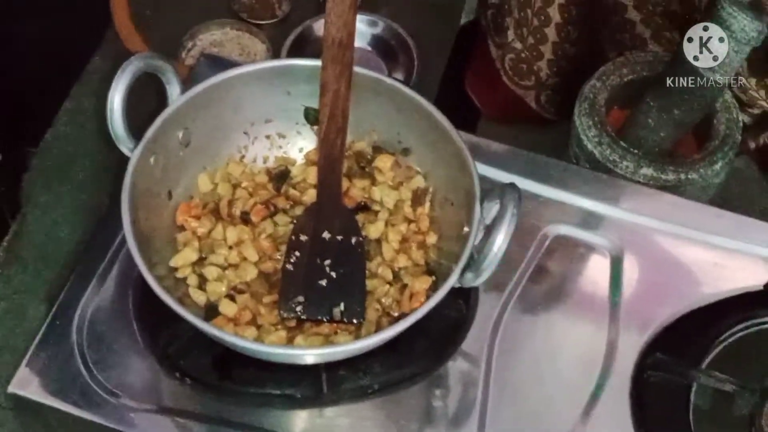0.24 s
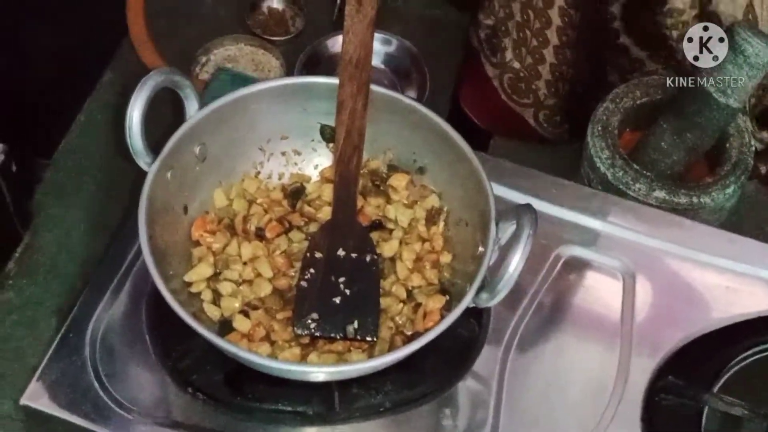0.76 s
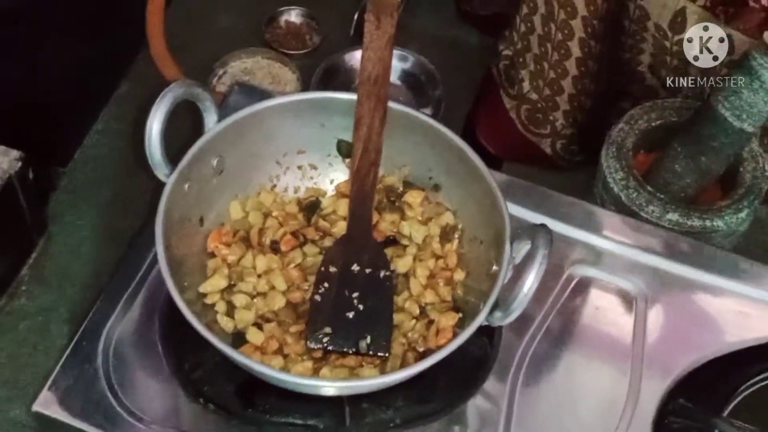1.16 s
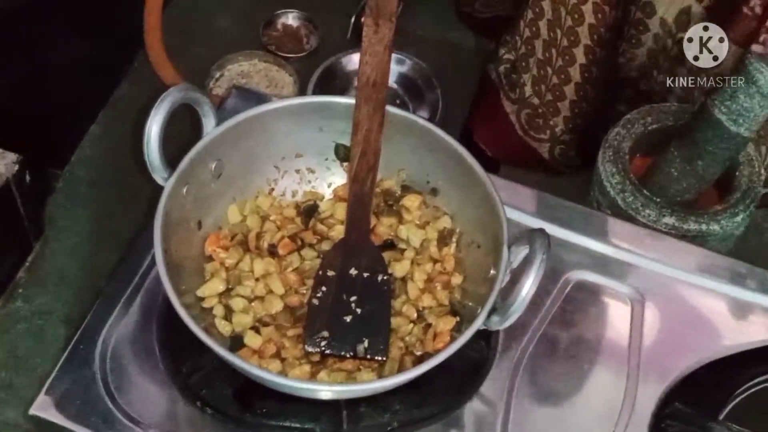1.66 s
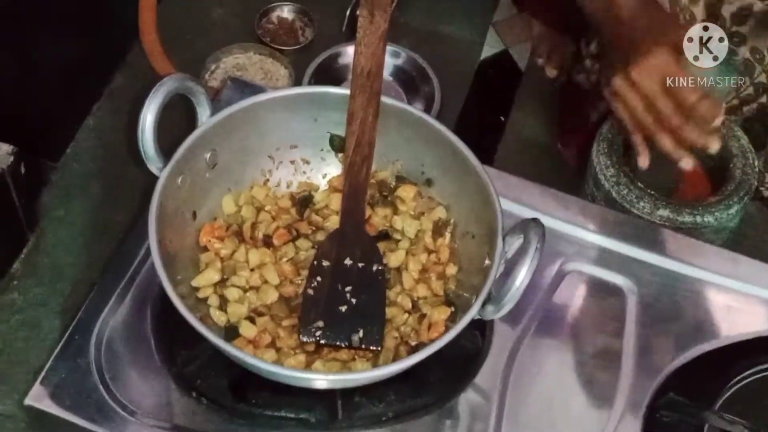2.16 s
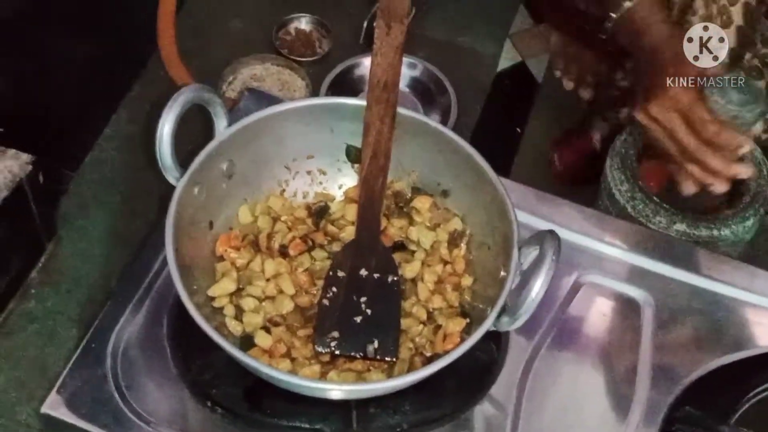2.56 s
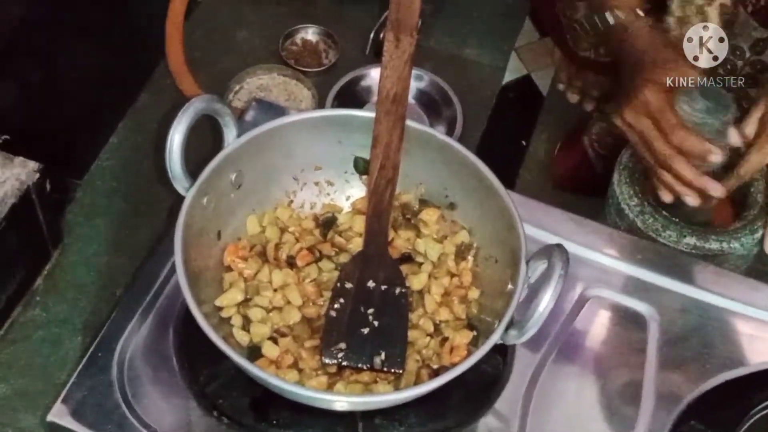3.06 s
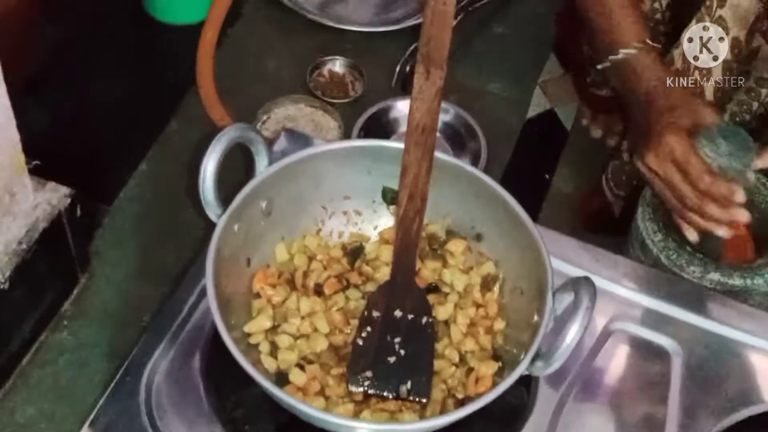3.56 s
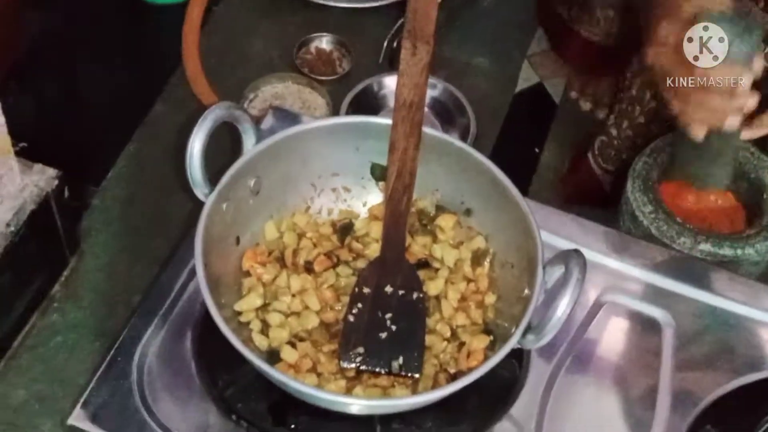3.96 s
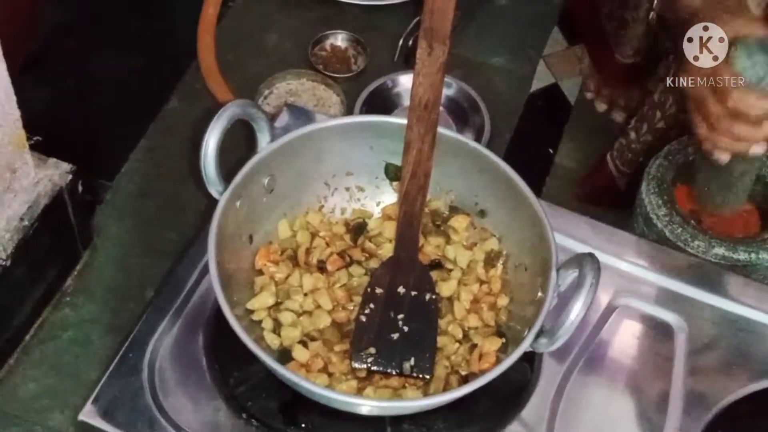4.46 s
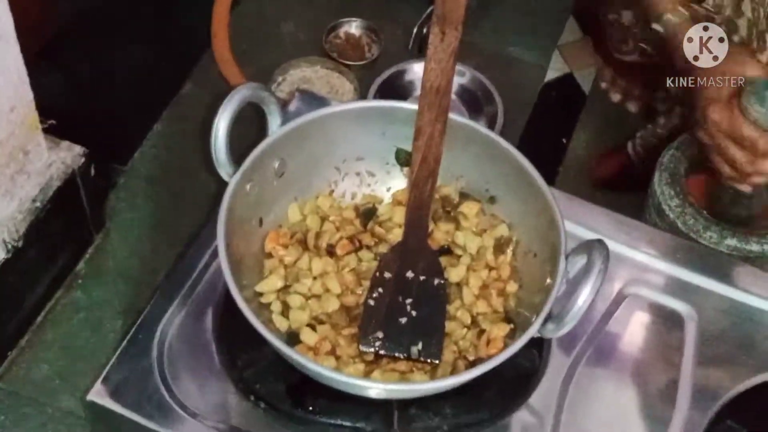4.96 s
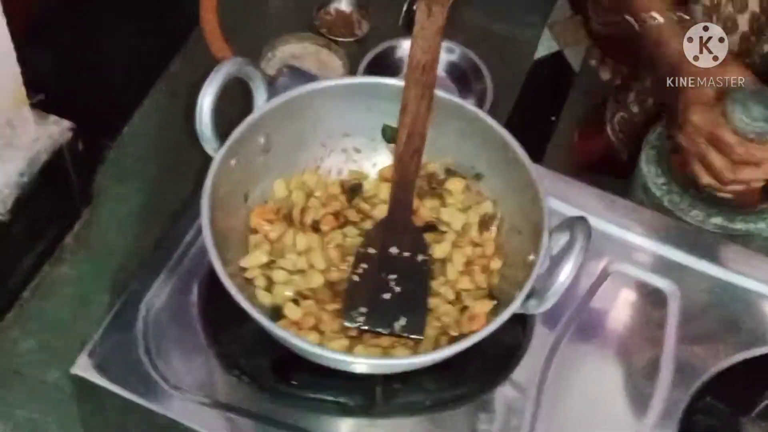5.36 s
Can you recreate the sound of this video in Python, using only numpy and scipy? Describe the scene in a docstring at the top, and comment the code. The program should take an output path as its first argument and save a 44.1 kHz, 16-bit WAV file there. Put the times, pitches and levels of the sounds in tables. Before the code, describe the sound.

A pan sizzles faintly throughout, with tiny oil spits, over soft burner noise and a low hum in a small, hard-walled kitchen. At 0.1 seconds comes a dull bump with a cloth rustle, then light ticks, and at 1.1 seconds a vessel is set down with a hollow, ringing knock and a small rebound. From 1.9 seconds a nearby stone pestle knocks into a mortar of moist spices: a soft touch, firmer strokes at 2.0 and 2.3, a tap at 2.6 and another knock at 2.9. The loudest blow booms at about 4.1 seconds, followed by a heavy double knock at 4.4, both ringing briefly in the room. Lighter knocks follow at 4.7, 4.9 and 5.5 seconds. Grit ticks between strokes, bangles tinkle very faintly near 2.9, 4.1 and 4.7 seconds, and cloth rustles softly near the end.

```python
"""Pestle and mortar in a kitchen

A stone pestle pounds moist spices in a stone mortar on the floor of a small, hard-walled kitchen.
A vessel is set down first; then come tentative knocks and two heavy blows that boom as the modes of
mortar, floor and room ring. Grit ticks, bangles tinkle and cloth rustles. A pan sizzles faintly over
burner noise and a low hum; a limiter ducks the sound under the hardest blow."""
import sys
import numpy as np
from scipy import signal
from scipy.fft import rfft, irfft
from scipy.io import wavfile
from scipy.ndimage import uniform_filter1d, minimum_filter1d

SR = 44100
rng = np.random.default_rng(int(sys.argv[2]) if len(sys.argv) > 2 else 0)


def put_to_file(sound):
    """Save the sound as 16-bit audio at rate SR, in the file named by the first command-line argument."""
    columns = np.atleast_2d(sound).T  # one column per channel
    safe = np.clip(columns, -1, 1)
    whole_steps = np.round(safe * 32767)
    wavfile.write(sys.argv[1], SR, whole_steps.astype(np.int16))


N = 247652
TIME = np.arange(N) / SR
RING_TIME = TIME[:SR]

# spectrum of a knock cushioned by paste: f/Hz, gain/dB
KNOCK_SPECTRUM = [(40, -33), (70, -14), (110, -11.5), (200, -4.5), (290, 1.5), (600, 1.5), (900, 0.5),
                  (1250, 1), (1700, -1), (2300, 2), (2750, -5.5), (3400, -14.5), (4300, -25), (9000, -56)]
# spectrum of ticks and rustle: f/Hz, gain/dB
TICK_SPECTRUM = [(200, -42), (1000, 2), (2200, 7), (3300, -2.5), (5200, -5), (6500, -15.5), (9000, -3.5),
                 (15000, -28)]


def pestle(ring_db, variation_db, room_db, build_s):
    """Impact excitation: each spot struck on the bowl drives mortar and room a little differently."""
    # mortar, floor and room ringing together: f/Hz, energy/dB, T60/s
    mortar_modes = [(69.8, 1.5, 0.59), (198.6, -15, 0.66), (276.7, -5.5, 0.24), (294, -14.5, 0.63),
                    (344, -22.5, 0.77), (400, -5.5, 0.16), (453, -5, 0.25), (481.2, -8, 0.4),
                    (562, -13.5, 0.55), (638.4, -3, 0.34), (737, -17, 0.62), (810, -5.5, 0.13),
                    (887, -5, 0.35), (891, -6.5, 0.23), (971, -7, 0.31), (1069, -7.5, 0.41),
                    (1480, -8, 0.19), (1630, -7.5, 0.26), (1850, -3, 0.13), (2096, -10, 0.39),
                    (2377, -34, 0.55), (2497, -8.5, 0.35)]
    # the stone itself, damped by hand and paste: f/Hz, energy/dB, T60/s
    stone_modes = [(293, -10, 0.011), (629, -7.5, 0.031), (920, -10, 0.011), (1614, -8, 0.0054),
                   (2280, -7.5, 0.011)]
    out, variation = np.zeros(N), from_db(variation_db)
    common_room = kitchen(room_db, build_s)
    boom = from_db(ring_db) * ringing(mortar_modes)
    stone = ringing(stone_modes, scatter=0)
    for onset, force_db, low_hz, high_hz, spot_hz in contacts():
        room = (common_room + variation * kitchen(room_db, build_s)) / np.hypot(1, variation)
        stone_db = -.7 + 2.5 * np.log2(high_hz / 1500)  # harder contacts ring more
        response = wall(room, echo_db=-8.5) + boom + from_db(stone_db) * stone
        response = bowl_resonance(response, spot_hz, boost_db=5.0, q=4.7)
        add(out, onset, from_db(force_db) * strike(response, low_hz, high_hz))
    return from_db(-2) * colour(out, KNOCK_SPECTRUM)


def contacts(cushion_octaves_per_s=13, fall_octaves_per_s=30):
    """Double impact: a stroke that lands on the bowl's side slips down and seats, lower and duller."""
    # t/s, force/dB, bass roll-off/Hz, treble roll-off/Hz, pitch of the spot struck/Hz,
    # slip/s (0: straight to the bottom), seating force over the first contact/dB
    strokes = [(1.87, -14, 260, 1400, 490, 0, 0), (2.0312, 5.7, 310, 2600, 1850, .0185, -2.6),
               (2.3368, 9.3, 190, 1680, 345, .012, 4.3), (2.640, -17, 270, 2000, 330, 0, 0),
               (2.904, 0, 230, 1380, 560, .01, 5.6), (3.967, -15, 150, 450, 303, 0, 0),
               (4.0669, 29.5, 100, 1700, 305, 0, 0), (4.4271, 12.6, 117, 2780, 2380, .06, -1),
               (4.729, 3.5, 175, 1450, 700, 0, 0), (4.909, -4, 100, 380, 300, 0, 0),
               (5.4979, -5, 600, 1200, 1000, .008, 6.6)]
    for onset, force_db, low_hz, high_hz, spot_hz, slip_s, seat_db in strokes:
        yield onset, force_db, low_hz, high_hz, spot_hz
        if slip_s > 0:
            cushion = 2 ** (-cushion_octaves_per_s * slip_s)  # deeper in the paste
            fall = 2 ** (-fall_octaves_per_s * slip_s)  # nearer the thick bottom
            yield onset + slip_s, force_db + seat_db, low_hz * cushion, high_hz * cushion, spot_hz * fall


def strike(response, low_hz, high_hz):
    """Contact filtering: a soft impact loses treble; a glancing one barely drives the floor's bass."""
    softened = signal.sosfilt(signal.butter(3, high_hz, fs=SR, output="sos"), response)
    return signal.sosfilt(signal.butter(2, low_hz, "high", fs=SR, output="sos"), softened)


def bowl_resonance(x, hz, boost_db, q):
    """Resonance lifts a broad band around the pitch of the spot struck."""
    return x + (from_db(boost_db) - 1) * signal.lfilter(*signal.iirpeak(hz, q, fs=SR), x)


def ringing(modes, scatter=1):
    """Superposition of damped modes; waves arriving by way of the room have scattered phases."""
    out = 0
    for hz, energy_db, t60 in modes:
        wave = np.cos(2 * np.pi * (hz * RING_TIME + scatter * rng.random()))
        attack = 1 - np.exp(-2 * RING_TIME * hz)
        decay = np.exp(-np.log(1000) * RING_TIME / t60)
        out = out + from_db(energy_db) * unit_energy(wave * attack * decay)
    return out


def kitchen(room_db, build_s):
    """Room impulse response: direct sound, early reflections and a diffuse tail dying band by band."""
    # reverberation time: f/Hz, T60/s
    decay_times = [(60, 1), (160, 0.45), (420, 0.39), (1100, .44), (3000, 0.5)]
    # reflections from nearby surfaces: delay/s, level/dB
    reflections = [(.0042, -4), (.0068, -8.5)]
    hz = np.fft.rfftfreq(SR, 1 / SR)
    white, tail = rfft(rng.standard_normal(SR)), 0
    build_up = 1 - np.exp(-(RING_TIME / build_s) ** 2)
    edges_hz = np.geomspace(40, 16000, 25)
    for low, high in zip(edges_hz, edges_hz[1:]):
        band = irfft(white * ((hz >= low) & (hz < high)), SR)
        decay = np.exp(-np.log(1000) * RING_TIME / at_hz(decay_times, np.sqrt(low * high)))
        tail = tail + unit_energy(band * decay * build_up) * np.sqrt(2 * (high - low) / SR)
    response = from_db(room_db) * tail
    response[0] += 1
    for delay_s, echo_db in reflections:
        response[round(delay_s * SR)] += from_db(echo_db)
    return response


def wall(x, echo_db, delay_s=.01075):
    """Comb filtering: one reflection off a bare wall interferes with the sound and makes it hollow."""
    gain, lag = from_db(echo_db), round(delay_s * SR)
    delayed = np.pad(x, (lag, 0))[:len(x)]
    return (x + gain * delayed) / np.hypot(1, gain)


def vessel(room, ring_gain_db):
    """Free vibration: a vessel, shifted and set down, rings with a hollow knock and a rebound."""
    # t/s, force/dB, bass roll-off/Hz, treble roll-off/Hz, relative ring level/dB
    bumps = [(0.1025, 6.5, 160, 378, -44), (0.104, -7.5, 760, 2540, -32), (1.1358, 6.7, 60, 1500, -2.7),
             (1.2545, -3.8, 80, 1400, -1.5)]
    # ring of the vessel: f/Hz, energy/dB, T60/s
    modes = [(88.9, -1.5, 0.69), (125, -12, 0.68), (598, 2.5, 0.1), (565, -1.5, 0.43), (615, -5.5, .48),
             (654, -1.5, 0.4), (1450, -7, 0.11)]
    out = np.zeros(N)
    for onset, force_db, low_hz, high_hz, ring_db in bumps:
        response = room + from_db(ring_db + ring_gain_db) * ringing(modes, scatter=0)
        add(out, onset, from_db(force_db) * strike(response, low_hz, high_hz))
    return colour(out, KNOCK_SPECTRUM)


def ticks(room):
    """Impulse excitation: light, hard touches of grit and stone, and the bright first contact of the vessel as
    it is set down, each sound the room's response."""
    # t/s, relative level/dB
    touches = [(0.8543, -22), (0.962, -25), (1.1358, -19), (2.641, -23), (4.906, -16.5), (5.2046, -16),
               (5.465, -21)]
    out = np.zeros(N)
    for onset, level_db in touches:
        add(out, onset, from_db(level_db) * room)
    return colour(out, TICK_SPECTRUM)


def bangles():
    """Beating: close, high modes of the bangles on the wrist ring faintly as the arm stops."""
    # t/s, peak level/dB
    tinkles = [(2.91, -55), (4.07, -47), (4.738, -53), (4.775, -52)]
    # ring of the bangles: f/Hz, energy/dB, T60/s
    modes = [(5740, 0, .3), (5810, -4, .25), (7010, -13, .2)]
    out = np.zeros(N)
    for onset, peak_db in tinkles:
        ring = ringing(modes)
        add(out, onset, from_db(peak_db) * ring / np.abs(ring).max())
    return out


def cloth(grain_db):
    """Friction noise: cloth rustles unevenly as the cook moves, swelling until the move stops."""
    # t/s, duration/s, level at full swell/dB
    moves = [(.05, .19, -47.5), (1.64, .09, -57), (5.15, .4, -57)]
    envelope = sum(from_db(level_db) * swell(onset, length_s, attack_s=length_s, release_s=.07)
                   for onset, length_s, level_db in moves)
    grain = from_db(grain_db * drift(200))
    return envelope * grain * rms_one(colour(rng.standard_normal(N), TICK_SPECTRUM))


def pan(level_db, pops_per_s, pop_db, flicker_db):
    """Vaporisation: steam hisses and oil pops; the sizzle flares when moisture meets the hot oil."""
    # spectrum of the sizzle: f/Hz, relative level/dB
    spectrum = [(2500, -26.5), (3900, -12), (5200, -3.5), (6000, -12), (6600, -16.5), (7500, -6.5),
                (8400, 4), (9300, -3), (10800, -11), (12100, -20.5), (13500, -9), (15500, -10)]
    # t/s, duration/s, rise/dB
    flares = [(1.14, .1, 1.5), (2.0, .15, 1.8), (4.15, .68, 3), (5.17, .4, 1.8)]
    pops = (rng.random(N) < pops_per_s / SR) * rng.standard_normal(N)
    hiss = rng.standard_normal(N) * from_db(flicker_db * drift(60))
    sizzle = rms_one(colour(hiss + from_db(pop_db) * pops, spectrum))
    flare_db = sum(rise_db * swell(onset, length_s, attack_s=.07, release_s=.1)
                   for onset, length_s, rise_db in flares)
    sway_db = .3 * drift(2.5)
    return from_db(level_db + sway_db + flare_db) * sizzle


def spits(filter_width_hz):
    """Narrow-band noise: steam squeezes out of a droplet in the oil with a short, pitched hiss."""
    # t/s, f/Hz, peak level/dB
    droplets = [(1.19, 13400, -46.5), (1.31, 4850, -50), (1.545, 8800, -47), (2.485, 5400, -51),
                (4.145, 8300, -40), (4.82, 8400, -43)]
    out = np.zeros(N)
    for onset, hz, peak_db in droplets:
        puff = rng.standard_normal(N) * swell(onset, length_s=.013, attack_s=.013, release_s=.025)
        b, a = signal.iirpeak(hz, hz / filter_width_hz, fs=SR)
        hiss = signal.lfilter(b, a, signal.lfilter(b, a, puff + 1e-18) + 1e-18)
        out += from_db(peak_db) * hiss / np.abs(hiss).max()
    return out


def background(air_db, waver_db, wander_rad):
    """Broadband noise of air and burner, with a low hum modulated at random in level and phase."""
    # air and burner noise: f/Hz, relative level/dB
    spectrum = [(25, -40), (45, -10), (62, -7.5), (130, -1), (170, -1.5), (280, -2), (430, -4.5), (650, -4),
                (950, -8.5), (1500, -4.5), (2350, -1), (3100, -10), (4200, -16), (7000, -59)]
    # tones of the hum: f/Hz, rms level/dB
    tones = [(199.2, -64), (249, -64.5)]
    out = from_db(air_db + 1.2 * drift(5.6)) * rms_one(colour(rng.standard_normal(N), spectrum))
    for hz, level_db in tones:
        amplitude = np.sqrt(2) * from_db(level_db + waver_db * drift(3))
        out += amplitude * np.sin(2 * np.pi * hz * TIME + wander_rad * drift(6))
    return out


def from_db(db):
    """Amplitude ratio of a level in decibels."""
    return 10 ** (np.asarray(db) / 20)


def rms_one(x):
    """Normalisation to an rms of 1."""
    return x / np.sqrt(np.mean(x ** 2) + 1e-20)


def unit_energy(x):
    """Normalisation to the energy of a unit impulse."""
    return x / np.sqrt(np.sum(x ** 2) + 1e-20)


def at_hz(points, hz):
    """Interpolation of a table on a log-frequency axis."""
    known_hz, values = np.transpose(points)
    return np.interp(np.log(np.maximum(hz, 1)), np.log(known_hz), values)


def colour(x, spectrum, size=8192):
    """Minimum-phase filtering: folding the cepstrum gives a causal filter with the given spectrum."""
    gain = from_db(at_hz(spectrum, np.fft.rfftfreq(size, 1 / SR)))
    cepstrum = irfft(np.log(gain))
    cepstrum[1:size // 2] *= 2
    cepstrum[size // 2 + 1:] = 0
    response = irfft(np.exp(rfft(cepstrum)))
    return signal.fftconvolve(x, response)[:len(x)]


def drift(knots_per_s):
    """Random modulation with an rms of 1, linear between knots."""
    knots = rng.standard_normal(4096)
    return rms_one(np.interp(TIME * knots_per_s, np.arange(len(knots)), knots))


def swell(onset, length_s, attack_s, release_s):
    """Trapezoidal envelope from 0 to 1; the release begins length_s after the onset."""
    rise = (TIME - onset) / attack_s
    fall = 1 - (TIME - onset - length_s) / release_s
    return np.clip(np.minimum(rise, fall), 0, 1)


def add(track, onset, sound):
    """Superposition of a sound on the track, from an onset in seconds."""
    start = round(onset * SR)
    track[start:start + len(sound)] += sound[:N - start]


def scene():
    """Superposition: the pressures of all sources in the kitchen add in one channel."""
    pounding = pestle(ring_db=-6.5, variation_db=-3, room_db=9.3, build_s=0.0039)
    bumps = vessel(kitchen(room_db=8, build_s=0.00079), ring_gain_db=-4)
    handling = ticks(kitchen(room_db=4.5, build_s=0.0047)) + bangles() + cloth(grain_db=4.0)
    sizzle = wall(pan(level_db=-55.8, pops_per_s=23, pop_db=17, flicker_db=1.3), echo_db=-15)
    ambience = background(air_db=-52, waver_db=1.5, wander_rad=0.74)
    return (pounding + bumps + handling + sizzle + spits(filter_width_hz=600) + ambience)[None]


def record(dry, limit_db=-1.2, look_ahead_s=.018, release_db_per_s=34.5, cutoff_hz=15600):
    """Peak limiting: the gain falls ahead of a peak and recovers slowly; a steep low-pass follows."""
    excess_db = np.maximum(20 * np.log10(np.abs(dry[0]) + 1e-9) - limit_db, 0)
    ahead = round(look_ahead_s * SR)
    held_db = -minimum_filter1d(-excess_db, 2 * ahead)
    release_db = release_db_per_s * TIME
    duck_db = np.maximum.accumulate(held_db + release_db) - release_db
    limited = dry * from_db(-uniform_filter1d(duck_db, ahead))
    return signal.sosfilt(signal.ellip(12, .1, 80, cutoff_hz, fs=SR, output="sos"), limited)


dry = scene()
out = record(dry)
put_to_file(out)
```